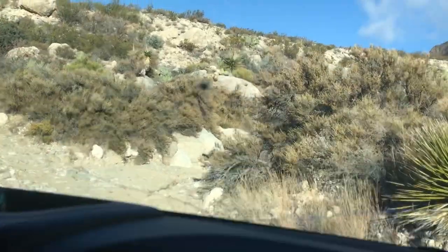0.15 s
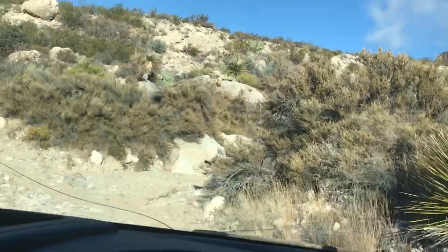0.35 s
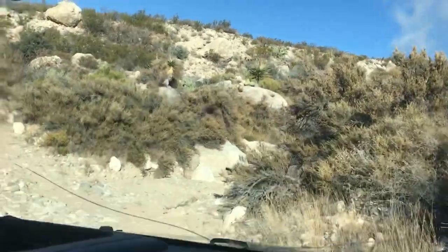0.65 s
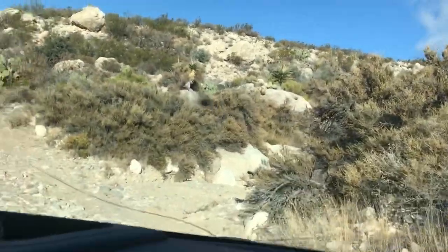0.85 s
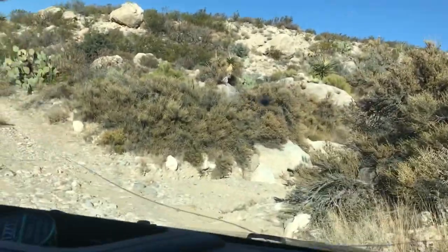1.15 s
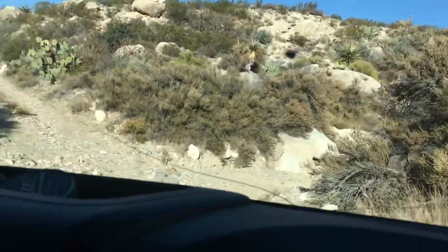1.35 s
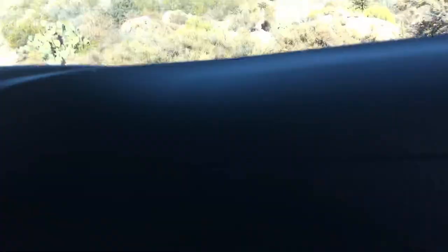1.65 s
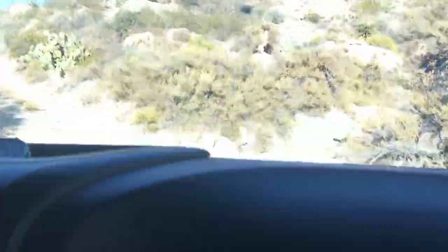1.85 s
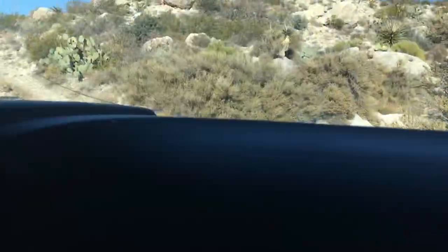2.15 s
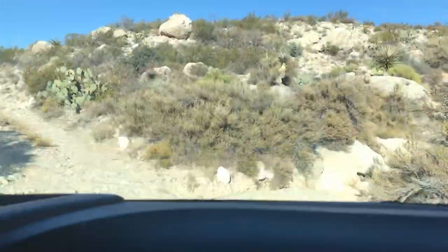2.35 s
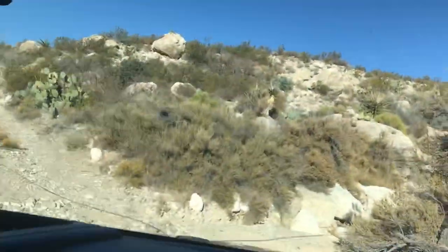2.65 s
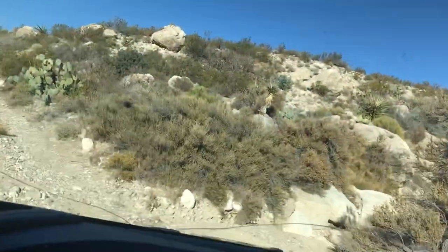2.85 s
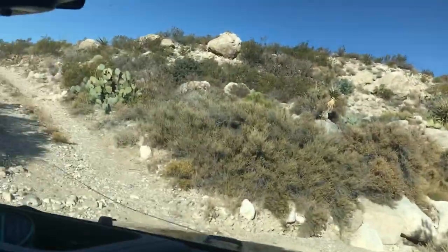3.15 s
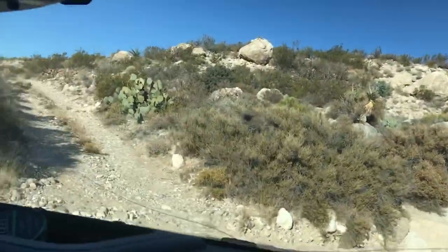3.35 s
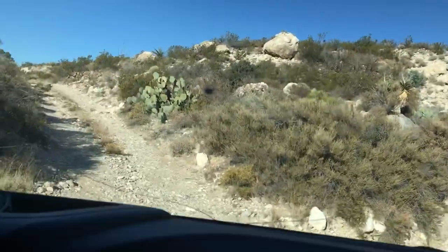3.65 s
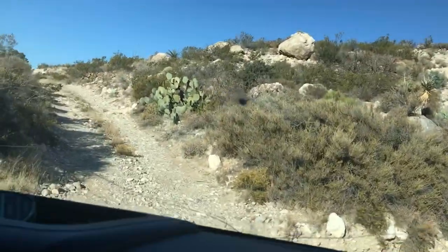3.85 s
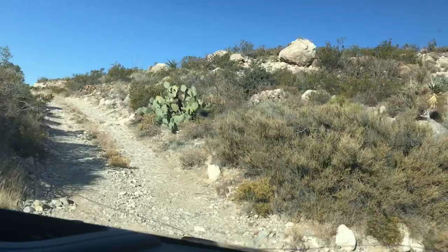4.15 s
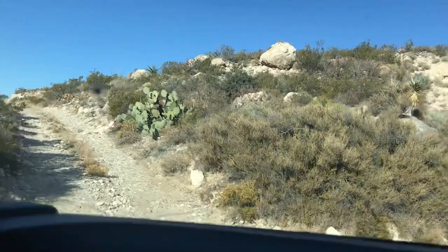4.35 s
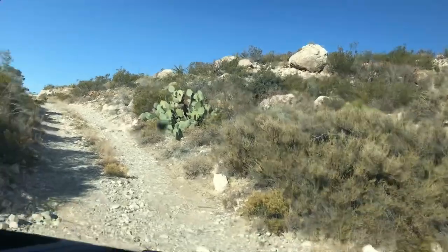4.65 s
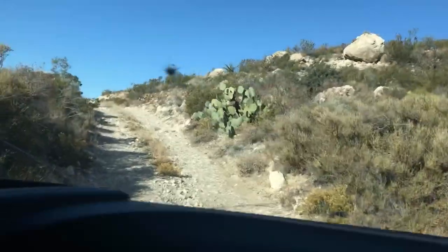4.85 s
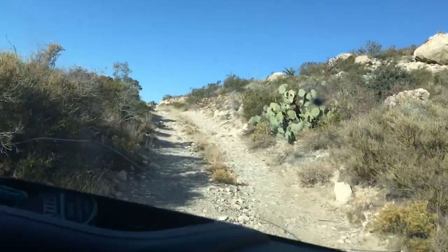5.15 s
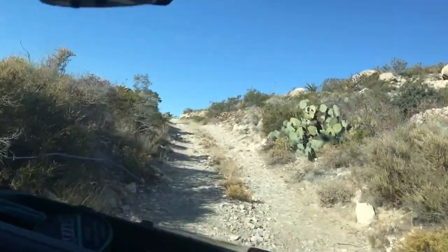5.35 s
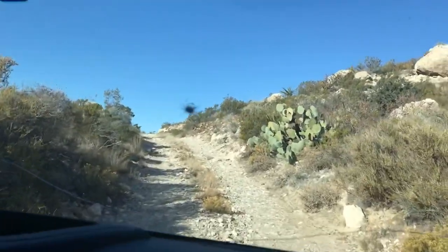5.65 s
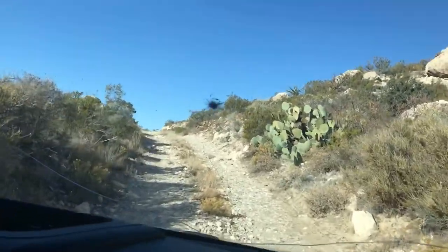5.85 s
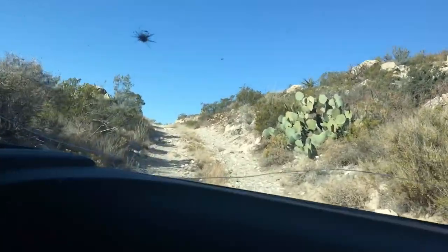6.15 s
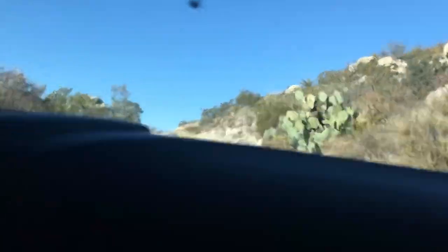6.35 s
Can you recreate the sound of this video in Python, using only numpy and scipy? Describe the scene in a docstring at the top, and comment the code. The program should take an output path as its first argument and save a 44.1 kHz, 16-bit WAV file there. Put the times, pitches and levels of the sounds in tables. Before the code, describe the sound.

Inside a closed off-road vehicle crawling over rocks, a low, slightly unsteady engine drone just above idle runs throughout, under deep body sway, panel boom and dull gravel grinding. From 0.2 to 0.7 s soft thumps set plastic trim rattling and stones knocking; another thump comes at 0.9 s. A drop at 1.7 s adds a stone snap, then small hard ticks after 2 s and dry brush rasping the door at 2.2 s. Heavier thumps follow between 2.4 and 3.1 s, with a tiny squeak at 2.8. It is calmer until about 4.4 s, when brush scratches the window and thumps build to a strong one at 4.9. Loose metal clashes brightly at 5.05 s, with a faint squeak. A buckle clanks at 5.5, a hollow vessel bounces at 5.7, and a louder ringing clank at 6.2 precedes final knocks and ticks, engine swelling slightly. Short, dense cab reflections; almost no outdoor space.

```python
"""A low engine drone just above idle, then jolts: an off-road vehicle on a rocky trail, heard in the cab.
The engine is a sum of crankshaft orders; body sway, boom and grinding are coloured noise.
Trim, stones and loose gear are clusters of random contacts exciting a body; thumps, buckle and vessel
ring in modes. Dry brush is stick-slip through panel resonances; rubbing metal squeaks as a short tone."""
import sys
import numpy as np
from scipy import signal
from scipy.fft import rfft, irfft
from scipy.io import wavfile
from scipy.ndimage import uniform_filter1d

SR = 44100
rng = np.random.default_rng(int(sys.argv[2]) if len(sys.argv) > 2 else 0)


def file_out(sig):
    """Save sig as 16-bit WAV at sys.argv[1]."""
    # one column per channel
    cols = np.atleast_2d(sig).T
    # limit, then scale
    lim = np.clip(cols, -1, 1)
    pcm = np.round(lim * 32767).astype(np.int16)
    wavfile.write(sys.argv[1], SR, pcm)


N = 286209

# rel_db: level before the trims, flutter and cab tails applied in the functions
# every *_COLOUR: spectrum of a response [freq_hz, density_db]; every *_MODES: [freq_hz, level_db, t60_s]


def amp(db):
    """Decibels to gain."""
    return 10 ** (np.asarray(db) / 20)


def unit(x):
    """Scale to rms 1."""
    return x / np.sqrt(np.mean(x ** 2) + 1e-20)


def curves(table):
    """Interpolate each column after time_s to one value per sample."""
    time_s, *columns = np.transpose(table)
    return [np.interp(np.arange(N) / SR, time_s, column) for column in columns]


def walk(rate_hz):
    """Smoothed random steps, rms 1."""
    size = max(2, int(SR / rate_hz))
    held = np.repeat(rng.standard_normal(N // size + 1), size)
    smooth = uniform_filter1d(uniform_filter1d(held, size), size)
    return unit(smooth[:N])


def convolve(x, response):
    """Pass a sound through a response, keeping its length."""
    return signal.oaconvolve(x, response)[:len(x)]


def body(points, size=8192):
    """Minimum-phase response of unit energy with the given spectrum."""
    hz, db = np.transpose(points)
    log_hz = np.log(np.fft.rfftfreq(size, 1 / SR) + 1)
    log_gain = np.log(amp(np.interp(log_hz, np.log(hz), db)))
    # fold the cepstrum to make the response causal
    cepstrum = irfft(log_gain)
    cepstrum[1:size // 2] *= 2
    cepstrum[size // 2 + 1:] = 0
    response = irfft(np.exp(rfft(cepstrum)))
    return response / np.linalg.norm(response)


def ring(modes, size=8192):
    """Sum of decaying sine modes, unit energy."""
    t = np.arange(size) / SR
    response = sum(amp(db - 60 * t / t60) * np.sin(2 * np.pi * hz * t) for hz, db, t60 in modes)
    return response / np.linalg.norm(response)


def grains(rate_hz, spread_db):
    """Random tiny contacts of uneven size and either sign, rms 1."""
    hit = rng.random(N) < rate_hz / SR
    sizes = amp(spread_db * np.clip(rng.standard_normal(N), -2, 2))
    return unit(hit * sizes * np.sign(rng.standard_normal(N)))


def steady(x, window_s):
    """Divide a noise by its running rms to even out slow swells."""
    power = uniform_filter1d(x ** 2, max(2, int(window_s * SR)))
    return x / np.sqrt(power + 1e-9)


def swells(events, rise_s, fall_s):
    """Gain per sample: each [start_s, length_s, level_db] rises, holds until its length is over, falls."""
    t = np.arange(N) / SR
    gain = np.zeros(N)
    for start_s, length_s, db in events:
        rise = np.clip((t - start_s) / rise_s, 0, 1)
        fall = np.clip(1 - (t - start_s - length_s) / fall_s, 0, 1)
        gain += amp(db) * rise * fall
    return gain


def chatter(events, response, rate_hz, spread_db, t60_s, rise_s=0, size=8192):
    """Contact clusters [start_s, length_s, level_db] build up, last, die away and excite one body."""
    out, t = np.zeros(N + 2 * size), np.arange(size) / SR
    contacts = np.pad(steady(grains(rate_hz, spread_db), 0.016), (0, size))
    build = np.minimum((t + 1 / SR) / (rise_s + 1 / SR), 1)
    for start_s, length_s, db in events:
        start, length_s = int(start_s * SR), max(length_s, .002)
        decay = amp(-60 * np.maximum(t - length_s * 0.87, 0) / t60_s)
        blow = convolve(contacts[start:start + size] * build * decay, response)
        # level = rms with the blow's energy spread over its length
        rms = np.sqrt(np.sum(blow ** 2) / (length_s * SR) + 1e-12)
        out[start:start + size] += amp(db) * blow / rms
    return out[:N]


def struck(events, modes, uneven_db):
    """Each blow [start_s, level_db] varies the mode levels, restarts the modes and cuts the ring before it."""
    out = np.zeros(N)
    spots = rng.standard_normal((len(events), len(modes)))
    for (start_s, db), spot in zip(events, spots):
        note = ring([(hz, mode_db + uneven_db * chance, t60) for (hz, mode_db, t60), chance in zip(modes, spot)])
        note = note / np.sqrt(np.mean(note[:SR // 100] ** 2))  # rms 1 over the first 10 ms
        start = int(start_s * SR)
        out[start:start + len(note)] = amp(db) * note[:N - start]
    return out


def cab(x, wet_db, t60_s):
    """Close glass and upholstery add a short, dense tail of decaying noise."""
    t = np.arange(SR // 4) / SR
    tail = rng.standard_normal(len(t)) * amp(-60 * t / t60_s) * (t > .002)
    return x + amp(wet_db) * convolve(x, tail / np.linalg.norm(tail))


# engine course: time_s, nominal_turn_hz, firing_rel_db, higher_orders_rel_db
ENGINE = [(0.0, 16.7, -52, -32.5), (0.16, 16.6, -34, -35), (0.54, 17.1, -46, -36.5),
          (2.33, 17.0, -38, -44.5), (2.37, 16.8, -28, -57), (2.48, 17.2, -37, -32),
          (2.75, 16.6, -36, -38.5), (3.11, 17.0, -34, -34.5), (3.4, 16.4, -37, -38), (3.96, 16.9, -36, -35),
          (5.28, 17.6, -40.5, -33), (5.86, 16.3, -35, -30), (6.36, 17, -31.5, -31.5),
          (6.49, 16.3, -28, -27)]
# crankshaft orders, two firings a turn: turn_multiple, rel_db
ENGINE_ORDERS = [(2, 0), (3, -0.5), (4, -10), (5, -36), (6, -21), (6.5, -15), (7, -15.5)]


def engine():
    """Crankshaft orders drone on one wandering speed, each wavering in level by chance."""
    turn_hz, firing_db, higher_db = curves(ENGINE)
    phase = 2 * np.pi * np.cumsum(turn_hz * (1.01 + 0.01213 * walk(9))) / SR
    drone = np.zeros(N)
    for multiple, order_db in ENGINE_ORDERS:
        level_db = firing_db if multiple == 2 else higher_db
        gain = amp(level_db + order_db + walk(6.2))
        drone += gain * np.sin(multiple * phase + rng.uniform(0, 2 * np.pi))
    return drone * amp(1.55)


# deep sway of the body over the ground: time_s, rel_db
SWAY = [(0.0, -48), (0.38, -34), (0.7, -38.5), (0.87, -30.5), (1.61, -38), (2.15, -36.5), (2.51, -32),
        (2.73, -40), (3.11, -32.5), (3.58, -34.5), (4.79, -32.5), (5.04, -27), (5.33, -33), (6.49, -27)]
SWAY_COLOUR = [(12, -39), (21, -15), (28, -0.5), (45, 7), (58, 7.5), (72, -5.5), (95, -10.5), (140, -60)]
# boom of the panels: time_s, rel_db
BOOM = [(0.0, -45), (0.4, -37.5), (1.19, -42.5), (1.59, -40), (1.9, -42), (2.78, -38.5), (2.96, -36.5),
        (3.45, -43.5), (4.12, -40), (4.57, -39.5), (4.79, -36.5), (5.75, -40.5), (6.25, -36), (6.49, -39.5)]
BOOM_COLOUR = [(50, -34), (78, 2.5), (100, 1.5), (118, -1.5), (160, -7.5), (200, -16.5), (240, -17),
               (310, -25), (500, -58.5)]
# wheel dropping off a rock: start_s, shake_length_s, rel_db
THUMPS = [(0.162, 0.044, -31.5), (.37, .05, -31.5), (.885, 0.084, -31), (1.69, 0.016, -27),
          (2.45, 0.063, -28.5), (2.67, 0.019, -29.5), (2.92, 0.1, -24.5), (3.09, 0.049, -27.5),
          (3.885, 0.036, -32), (4.04, 0.098, -32), (4.491, 0.038, -26), (4.65, 0.035, -26),
          (4.875, 0.025, -23.5), (6.09, 0.042, -25.5), (6.379, .03, -30)]
THUMP_RISE_S, THUMP_FALL_S = 0.016, 0.041
THUMP_RING_DB, THUMP_SWAY_DB, THUMP_BOOM_DB = -3, -1, -9.5  # each against the thump's rel_db


def rumble():
    """Rocks sway the body and make its panels boom; each thump briefly shakes both harder."""
    (sway_db,), (boom_db,) = curves(SWAY), curves(BOOM)
    shaken = swells(THUMPS, THUMP_RISE_S, THUMP_FALL_S)
    sway = steady(convolve(rng.standard_normal(N), body(SWAY_COLOUR)), 0.103)
    boom = steady(convolve(rng.standard_normal(N), body(BOOM_COLOUR)), 0.07)
    sway_gain = np.hypot(amp(sway_db - 0.35 + 1.6 * walk(11)), amp(THUMP_SWAY_DB) * shaken)
    boom_gain = np.hypot(amp(boom_db + 1.07), amp(THUMP_BOOM_DB) * shaken)
    return sway * sway_gain + boom * boom_gain


# low modes of the body
BODY_MODES = [(45.6, 0, 0.34), (64, -0.5, 0.13), (101.6, -1.5, 0.16), (165, -16.5, 0.12), (229, -20, 0.15)]


def thumps():
    """A wheel dropping off a rock strikes the body's low modes."""
    blows = [(start_s, db + THUMP_RING_DB) for start_s, _, db in THUMPS]
    return struck(blows, BODY_MODES, uneven_db=3.5)


# gravel grinding under the tyres: time_s, rel_db
TYRES = [(0.0, -59), (0.11, -59), (0.22, -55), (0.36, -53.5), (0.98, -57), (1.32, -57), (1.5, -55.5),
         (2.04, -55.5), (2.82, -54.5), (3.13, -57.5), (3.34, -58.5), (4.36, -56.5), (4.84, -52.5),
         (5.04, -52.5), (5.71, -55.5), (6.49, -52.5)]
GRIND_COLOUR = [(180, -18), (310, -0.5), (370, 2), (440, -3), (590, 1), (690, -3), (790, -5), (1000, -4),
                (1350, -9.5), (1650, -11.5), (2000, -18), (3000, -20.5), (5000, -43), (9000, -62)]
# crunching pebbles, also the snapping stones
SNAP_COLOUR = [(500, -6), (1100, -2), (1700, -0.5), (2300, -3.5), (3100, -2), (3800, -5), (4800, -14),
               (7000, -22), (11000, -27.5), (15000, -34)]
# patches of loose grit: start_s, length_s, rel_db
GRIT_PATCHES = [(.62, 0.12, -70.5), (.72, 0.18, -78), (1.53, .22, -66.5), (1.8, 0.37, -71.5),
                (2.25, .12, -68), (3.62, .32, -72.5), (4.43, .1, -63.5), (5.05, .12, -69.5),
                (5.9, 0.15, -68), (6.1, 0.36, -67)]
GRIT_COLOUR = [(900, -7), (1900, 8), (3000, 5.5), (4200, 6.5), (5200, 3), (6500, 4.5), (7600, -1.5),
               (9500, 3), (10300, -9.5), (12000, -2.5), (15500, -7)]
GRIT_RISE_S, GRIT_FALL_S, GRIT_BASE_REL_DB = 0.042, 0.057, -75  # base: hiss between patches


def tyres():
    """Gravel grinds dully under the tread, pebbles crunch in clusters, fine grit hisses above."""
    grind_db, = curves(TYRES)
    crunch = unit(grains(350, 2.7) + 1.28 * rng.standard_normal(N))
    grind = convolve(crunch, body(GRIND_COLOUR)) * amp(grind_db + 0.27 + 1.67 * walk(28))
    pebbles = convolve(grains(140, 2.7), body(SNAP_COLOUR)) * amp(grind_db - 15.5 + 4.9 * walk(22))
    sand = unit(rng.standard_normal(N) + 0.5 * grains(200, 6.2))
    loose = np.hypot(amp(GRIT_BASE_REL_DB), swells(GRIT_PATCHES, GRIT_RISE_S, GRIT_FALL_S))
    grit = convolve(sand, body(GRIT_COLOUR)) * loose * amp(7.5 + 1.7 * walk(30))
    return grind + cab(pebbles + grit, wet_db=-4.5, t60_s=0.021)


FAINT_SPREAD_DB = 3


def by_chance(mean_rate_hz, length_s, offset_db, count=80):
    """Rows [start_s, length_s, rel_db] at uneven intervals, stronger where the grinding is louder."""
    chance = rng.standard_normal((count, 2))
    times_s = np.cumsum(np.exp(.5 * chance[:, 0])) / mean_rate_hz
    levels_db = np.interp(times_s, *np.transpose(TYRES)) + offset_db + FAINT_SPREAD_DB * chance[:, 1]
    return [(start_s, length_s, db) for start_s, db in zip(times_s, levels_db) if start_s < N / SR]


# plastic trim chattering: start_s, length_s, rel_db, treble_over_level_db
RATTLES = [(.166, 0.016, -44.5, -24), (0.218, 0.049, -45.5, -13), (0.279, .026, -45.5, -14),
           (0.396, 0.025, -48.5, -12.5), (0.465, 0.021, -46.5, -15), (.625, 0.005, -50, -4),
           (0.64, .023, -48, -8.5), (0.687, 0.029, -54, -16), (1.045, 0.014, -54.5, -7),
           (1.32, 0.021, -51.5, -6), (1.585, .015, -51, -7), (1.675, 0.0096, -49.5, -8),
           (1.716, 0.01, -51, -8), (1.97, 0.023, -53.5, -7), (2.237, 0.016, -48.5, -14),
           (2.611, 0.018, -52, -16), (2.68, 0.01, -50, -29), (2.731, 0.012, -53.5, -6),
           (2.84, 0.017, -51, -28), (2.908, 0.013, -45.5, -10), (2.936, .009, -50, -23),
           (3.468, 0.014, -52.5, -10), (3.545, .007, -58.5, -2.5), (3.947, .007, -58.5, -1.5),
           (4.128, .034, -54.5, -8.5), (4.432, 0.022, -48.5, -13), (4.607, .016, -52.5, -13),
           (4.699, 0.022, -51, -13), (5.363, 0.049, -57.5, -7), (5.439, .01, -51.5, -19),
           (6.444, .02, -52.5, -7.5)]
TRIM_COLOUR = [(200, -24), (400, -2.5), (600, 3), (850, 1), (1250, 1), (1650, 0.5), (2100, -3.5),
               (2480, -1.5), (2700, -3), (2950, -1), (3400, -16.5), (4100, -7), (5000, -27), (9000, -38)]
TRIM_EDGE_COLOUR = [(2500, -27), (4500, -5), (5600, 2), (6300, 2), (7200, 3.5), (8000, 0.5), (9600, 0.5),
                    (10400, -14), (15500, -17)]
TRIM_MODES = [(590, -11, 0.025), (772, -1, 0.13), (994, 6, 0.072), (1294, 0.5, 0.074), (1657, 2.5, 0.071),
              (2407, 0, 0.038), (2840, -2, 0.023), (3970, -29, .04)]


def trim():
    """Plastic panels buzz against each other; their hard edges add a bright rasp."""
    panel = body(TRIM_COLOUR) + amp(-1.5) * ring(TRIM_MODES)
    faint = by_chance(2.5, length_s=0.02, offset_db=-4.5)
    rattles = [row[:3] for row in RATTLES] + faint
    edges = [(start_s, length_s, db + treble_db) for start_s, length_s, db, treble_db in RATTLES]
    edges += [(start_s, length_s, db - 6.0) for start_s, length_s, db in faint]
    buzz = chatter(rattles, panel, rate_hz=1500, spread_db=1.0, t60_s=0.038, rise_s=0.0064)
    rasp = chatter(edges, body(TRIM_EDGE_COLOUR), rate_hz=2500, spread_db=1.5, t60_s=0.016, rise_s=0.0071)
    return amp(1.2) * buzz + rasp


# small hard parts ticking: start_s, rel_db
TICKS = [(1.72, -52), (2.061, -44.5), (2.158, -40), (2.271, -47), (2.629, -40.5), (2.82, -45), (4.116, -53),
         (4.651, -48.5), (5.849, -44.5), (6.4, -43.5)]
TICK_COLOUR = [(1500, -20), (4000, -12.5), (6600, -7), (9000, -12.5), (11500, -7.5), (14000, -6),
               (15100, -4), (15600, 1), (16000, 4)]
TICK_S = 0.0048  # contact length
# loose metal gear clashing: start_s, length_s, rel_db
CLASHES = [(5.042,0.0097,-42), (5.052,0.0098,-31), (5.059,0.007,-25.5), (5.067,0.0058,-46),
           (5.158,0.005,-51), (5.218,0.012,-50), (5.264,0.0095,-45)]
GEAR_COLOUR = [(350, -35), (600, -8), (1010, -14.5), (1790, -22), (2260, -13), (2930, -22), (3190, -8),
               (3700, -14), (4250, -10), (7760, -7), (9270, 1), (11900, -6.5), (15800, -8.5)]
GEAR_MODES = [(3140, -11, 0.06), (4730, -21, 0.072), (5500, -24, 0.087), (6200, -3, .03), (7350, -1, 0.037),
              (7477, -13, 0.099), (8479, -0.5, 0.05), (9135, -19, .05), (9460, -3, 0.033),
              (15540, -5, 0.035)]
# buckle hitting the trim: start_s, length_s, rel_db, free_ring_over_level_db
CLANKS = [(4.724, 0.018, -45.5, -10), (5.542, 0.018, -41, -2.5), (6.229, 0.019, -34, -1)]
BUCKLE_COLOUR = [(500, -60), (1300, -5), (2100, -3.5), (2520, 0), (2800, -5), (3100, -2.5), (3850, 3),
                 (4700, -9.5), (5600, -7), (6600, -16.5), (8400, -15), (10400, -26), (12300, -21),
                 (15500, -32)]
BUCKLE_MODES = [(2600, -9, .06), (3000, 1, .07), (3970, -8, .045), (5500, -5.5, 0.16), (5570, -1, 0.12),
                (7200, -13, .05), (8490, -8.5, 0.11), (11100, -17, .09), (12240, -15, .06)]


def loose_gear():
    """Small parts tick, metal gear clashes and a buckle clanks: contact cracks, the metal ringing briefly."""
    tick_rows = [(start_s, TICK_S, db) for start_s, db in TICKS]
    ticks = chatter(tick_rows, body(TICK_COLOUR), rate_hz=2800, spread_db=2.5, t60_s=0.017)
    gear = body(GEAR_COLOUR) + amp(-4.5) * ring(GEAR_MODES)
    clashes = chatter(CLASHES, gear, rate_hz=5300, spread_db=3, t60_s=0.03, rise_s=.002)
    clank_rows = [row[:3] for row in CLANKS]
    clanks = chatter(clank_rows, body(BUCKLE_COLOUR), rate_hz=3000, spread_db=4.5, t60_s=0.055, rise_s=0.001)
    # free ring starts 30 % into the contact
    free = [(start_s + length_s * .3, db + ring_db) for start_s, length_s, db, ring_db in CLANKS]
    buckle = struck(free, BUCKLE_MODES, uneven_db=0.5)
    return amp(6.0) * ticks + amp(0.5) * clashes + amp(-1.7) * clanks + buckle


# stones knocking under the floor: start_s, length_s, rel_db
KNOCKS = [(.232, 0.02, -47), (.3, 0.03, -44.5), (.478, 0.016, -49.5), (2.448, 0.0068, -42),
          (3.072, 0.0076, -44), (4.873, .014, -39.5), (5.236, .0042, -41), (5.444, 0.0068, -45.5),
          (6.2, 0.023, -47.5), (6.344, .006, -54), (6.378, 0.0074, -38.5), (6.441, 0.017, -44),
          (6.468, .015, -45)]
KNOCK_COLOUR = [(120, -1), (300, 1.5), (430, -9.5), (600, 2), (780, -3), (1000, -5), (1400, -15),
                (2200, -20.5), (6000, -44)]
# stones snapping out from under the tread: start_s, length_s, rel_db
SNAPS = [(1.695, 0.0098, -41.5), (2.239, 0.0032, -40), (3.239, 0.0077, -43.5), (4.875, .005, -47.5),
         (5.192, 0.0082, -49.5), (5.846, 0.0064, -50)]


def stones():
    """Stones shift under the tyres: dull knocks through the floor, and sharp snaps."""
    faint = by_chance(5, length_s=.008, offset_db=-1)
    knocks = chatter(list(KNOCKS) + faint, body(KNOCK_COLOUR), rate_hz=4000, spread_db=1, t60_s=0.022)
    snaps = chatter(SNAPS, body(SNAP_COLOUR), rate_hz=4000, spread_db=7, t60_s=0.016)
    return amp(2.5) * knocks + amp(0.6) * snaps


def jolts():
    """Trim, gear and stones with their cab tails; the door's hollow prolongs the low part of the rattles."""
    panels = trim()
    band = signal.butter(2, [400, 1400], "bandpass", fs=SR, output="sos")
    low_part = signal.sosfilt(band, panels)
    hollow_tail = cab(low_part, wet_db=-3.5, t60_s=0.24) - low_part
    hard_parts = cab(loose_gear() + stones(), wet_db=-7.5, t60_s=0.069)
    return cab(panels, wet_db=-4.5, t60_s=0.11) + hollow_tail + hard_parts


# hollow metal vessel bouncing: start_s, rel_db
BOUNCES = [(5.656, -38.5), (5.6826, -35.5), (5.7257, -41.5)]
VESSEL_MODES = [(610, -16, .03), (780, 3.5, 0.17), (1020, 3, 0.027), (1110, -3, 0.032), (1225, -10, 0.13),
                (1710, -15, 0.27), (1964, -30, .15)]


def vessel():
    """A hollow vessel bounces in its holder; padding, a low-pass, takes the edge off each contact."""
    padding = signal.butter(2, 1600, fs=SR, output="sos")
    return signal.sosfilt(padding, struck(BOUNCES, VESSEL_MODES, uneven_db=2))


def scrape(pressure, panel, rate_hz, rough_db):
    """Twigs stick and slip in quick uneven steps and excite a panel's resonances."""
    slips = grains(rate_hz, 0.92) * amp(rough_db * walk(90))
    sound = np.zeros(N)
    for k, (hz, width_hz, db) in enumerate(panel):
        resonance = signal.lfilter(*signal.iirpeak(hz, hz / width_hz, fs=SR), slips)
        sound += (-1) ** k * amp(db) * resonance
    return unit(sound) * pressure


# brush strokes: start_s, length_s, rel_db
DOOR_SCRAPE = [(2.19, 0.032, -50), (2.25, .14, -47.5), (2.76, 0.069, -50), (2.84, .11, -58)]
WINDOW_SCRAPE = [(4.46, 0.11, -49.5)]
# panel resonances: freq_hz, width_hz, rel_db
DOOR_PANEL = [(750, 490, 5), (1620, 750, 2), (2880, 480, 2.5), (6750, 490, -4.5), (8400, 600, -8),
              (9440, 500, -8.5)]
WINDOW_PANEL = [(2470, 220, 0), (3680, 480, 3), (5300, 1300, -7.5), (7500, 3400, -19)]


def brush():
    """Dry brush slides along the door and the window, each with its own resonances."""
    door_pressure = swells(DOOR_SCRAPE, rise_s=0.04, fall_s=0.029)
    window_pressure = swells(WINDOW_SCRAPE, rise_s=0.1, fall_s=0.023)
    door = scrape(door_pressure, DOOR_PANEL, rate_hz=1800, rough_db=3)
    return door + scrape(window_pressure, WINDOW_PANEL, rate_hz=6200, rough_db=2.0)


# metal squeaking as it rubs: start_s, length_s, pitch_hz, level_db
SQUEAKS = [(2.824, 0.021, 4790, -55), (5.106, 0.075, 3140, -58.5)]


def squeaks():
    """Rubbing metal sings briefly on one unsteady note."""
    out = np.zeros(N)
    for start_s, length_s, pitch_hz, db in SQUEAKS:
        start, size = int(start_s * SR), int(length_s * SR)
        swell = np.interp(np.arange(size) / size, [0, .2, .75, 1], [0, 1, 1, 0])
        unsteady_hz = pitch_hz * (1 + .006 * walk(520)[:size])
        tone = np.sqrt(2) * np.sin(2 * np.pi * np.cumsum(unsteady_hz) / SR)
        out[start:start + size] = amp(db) * swell * tone
    return out


def scene():
    """Sum of all sources at the seat, one channel."""
    ride = engine() + rumble() + thumps() + tyres()
    return (ride + jolts() + vessel() + brush() + squeaks())[None, :]


def record(dry):
    """Steep low-pass: nearly nothing above 15.8 kHz."""
    return signal.sosfilt(signal.ellip(10, .2, 80, 15800, fs=SR, output="sos"), dry)


dry = scene()
out = record(dry)
file_out(out)
```